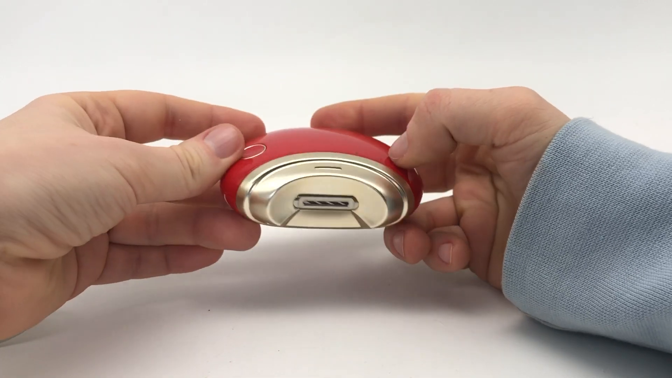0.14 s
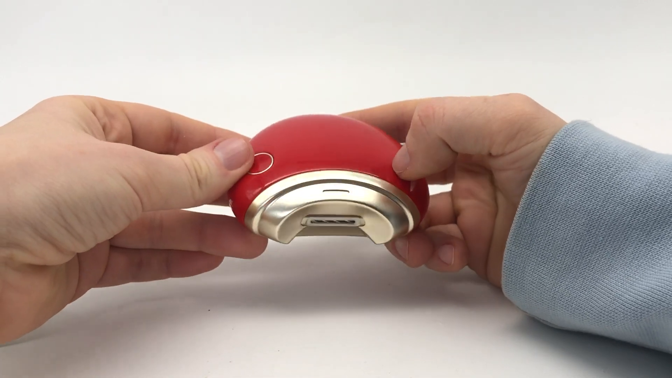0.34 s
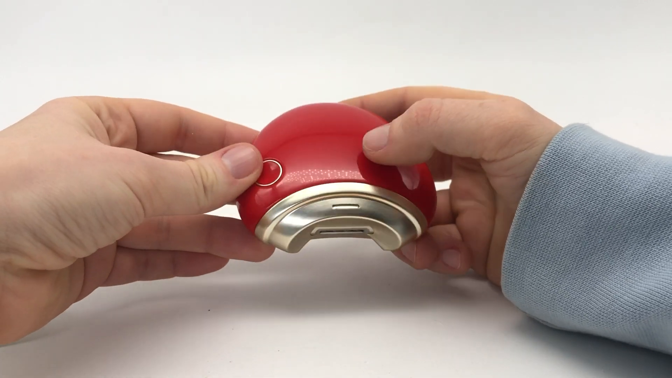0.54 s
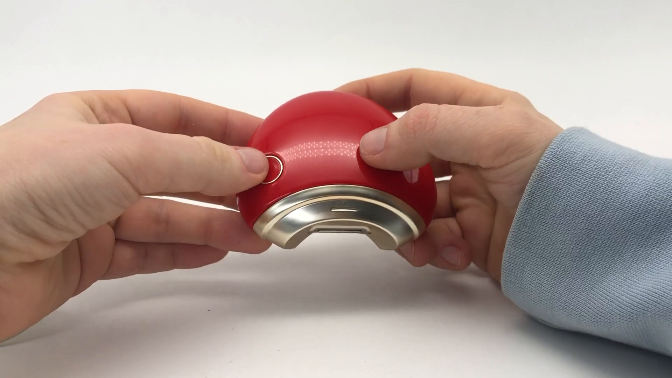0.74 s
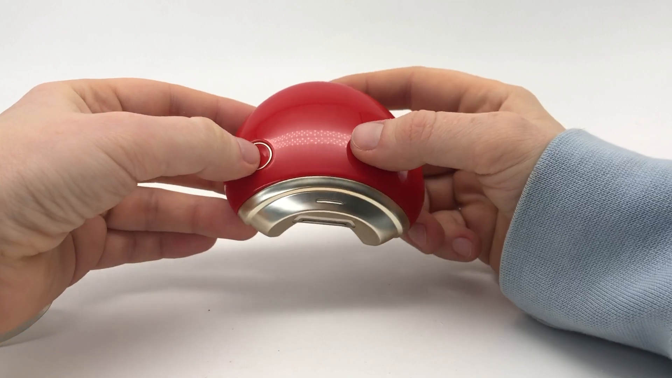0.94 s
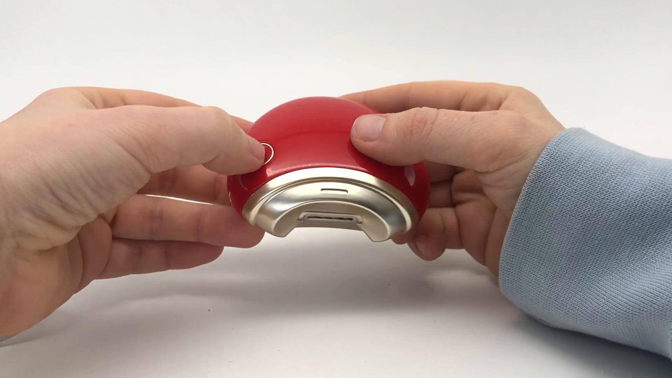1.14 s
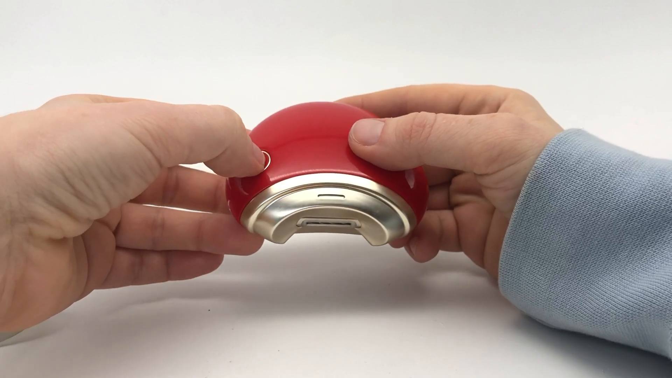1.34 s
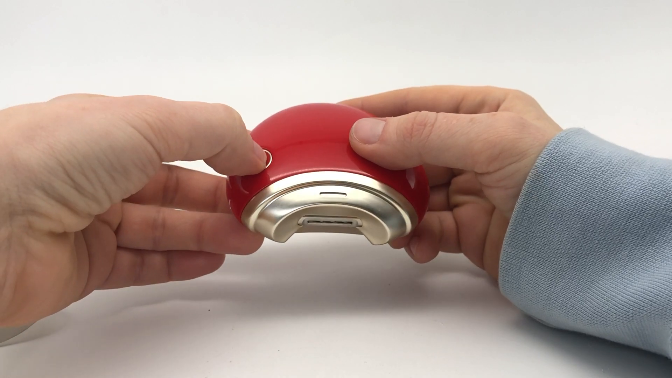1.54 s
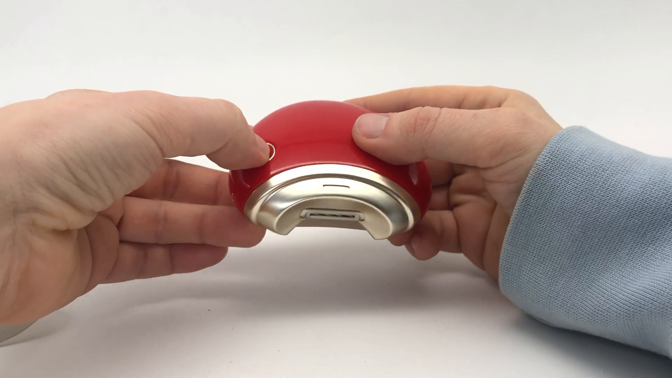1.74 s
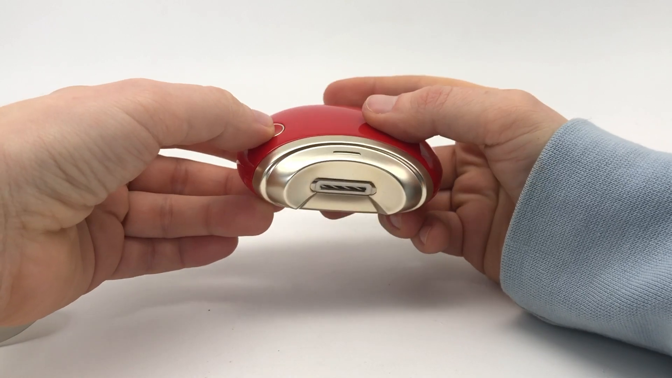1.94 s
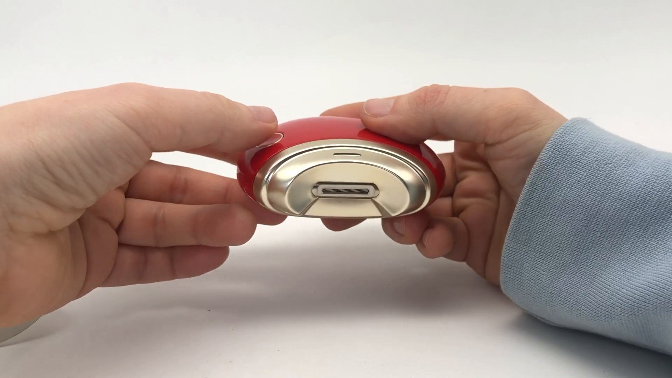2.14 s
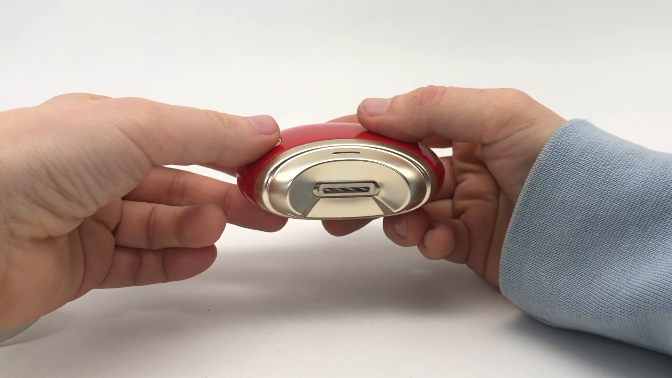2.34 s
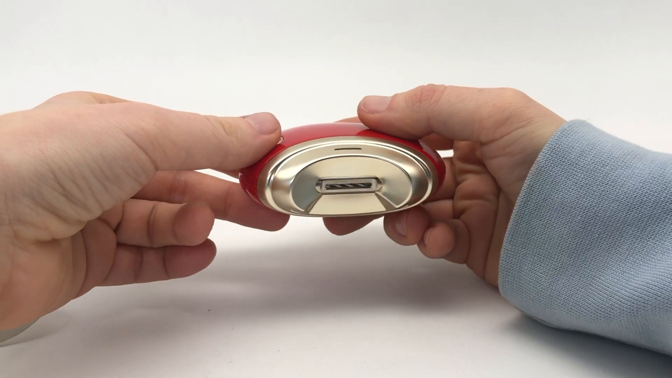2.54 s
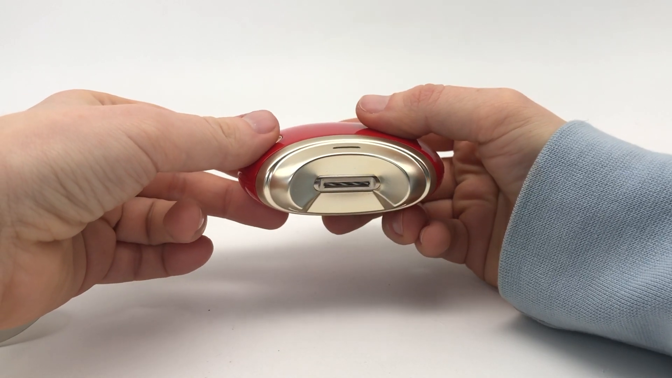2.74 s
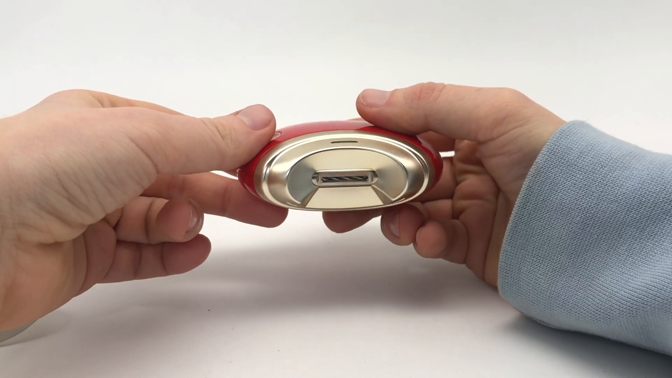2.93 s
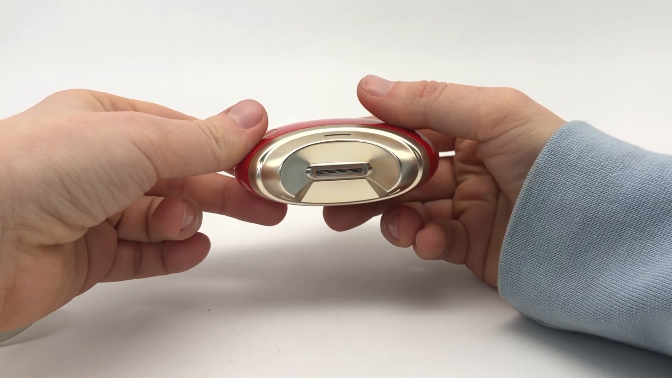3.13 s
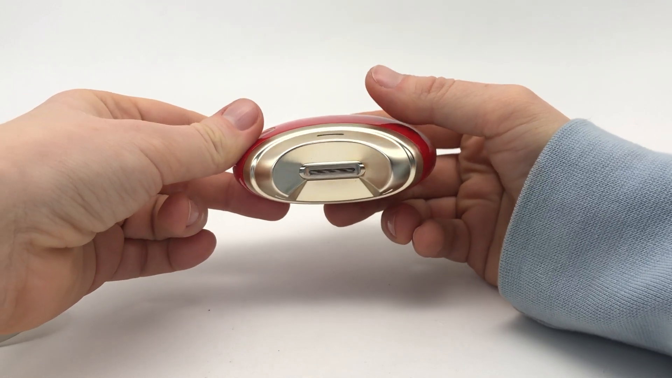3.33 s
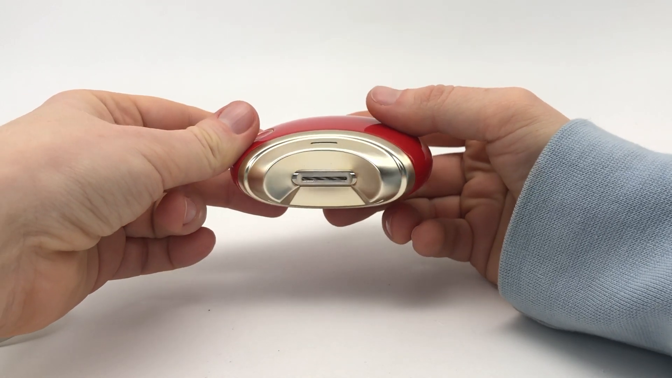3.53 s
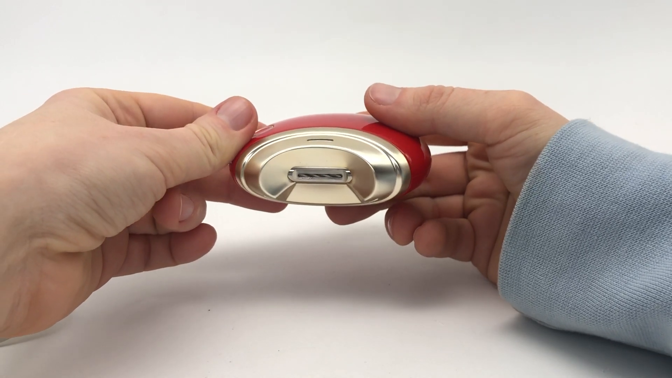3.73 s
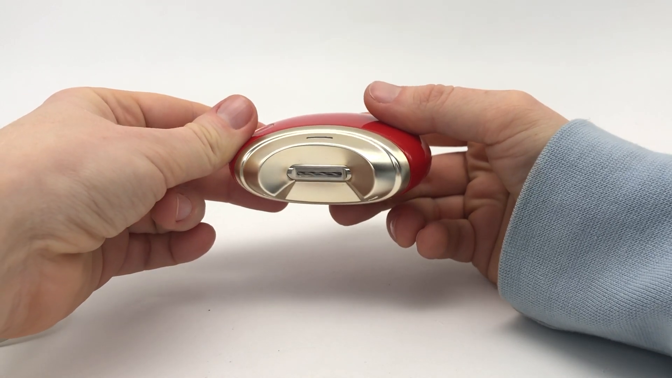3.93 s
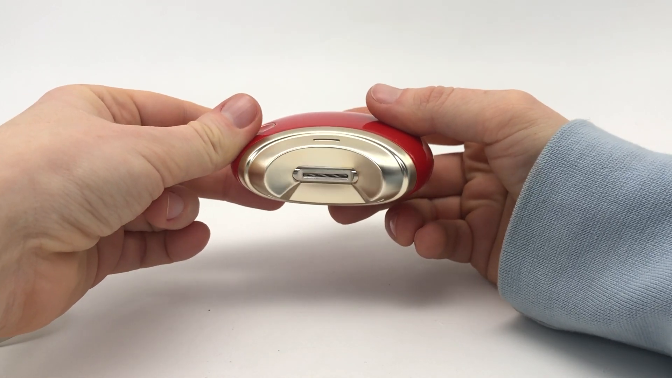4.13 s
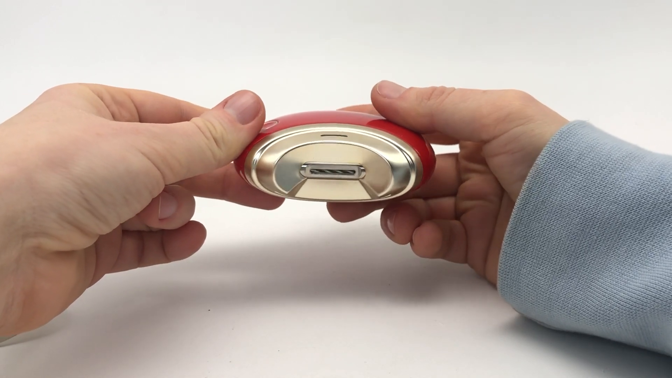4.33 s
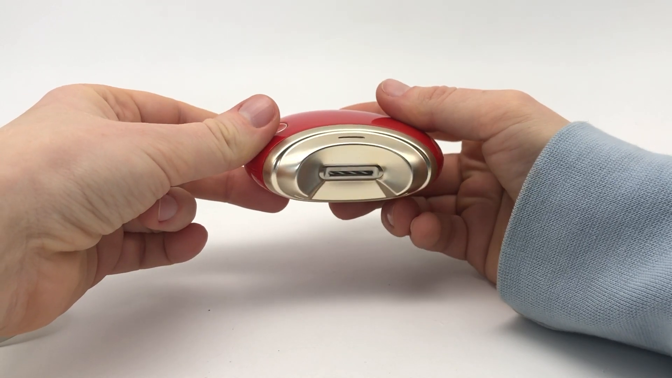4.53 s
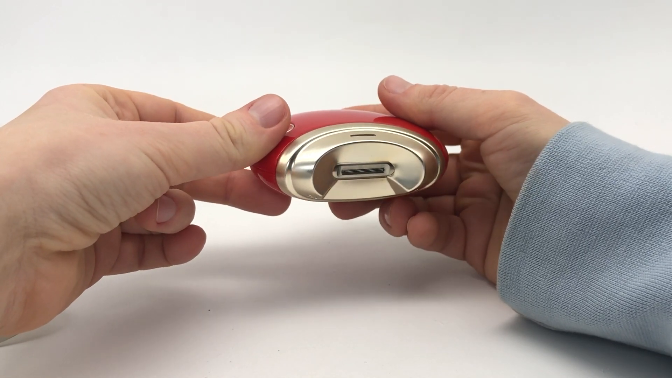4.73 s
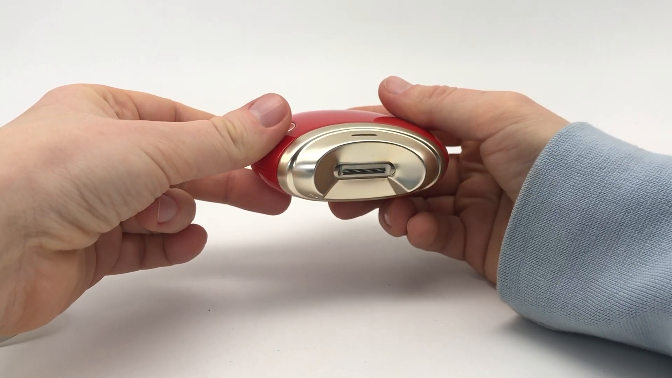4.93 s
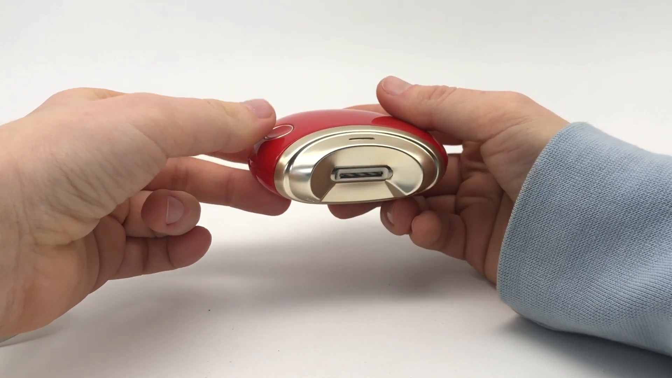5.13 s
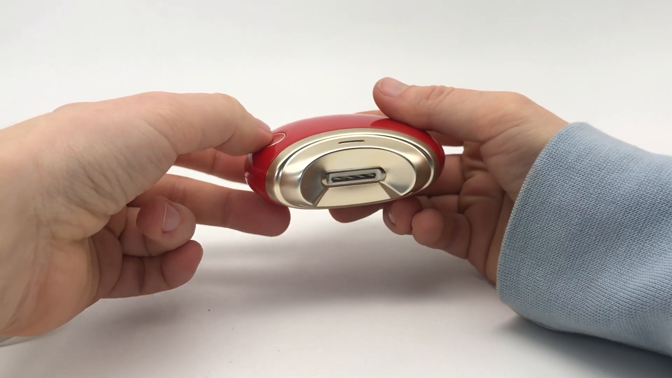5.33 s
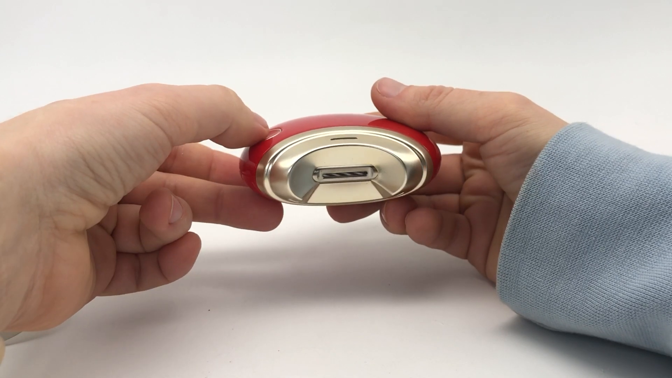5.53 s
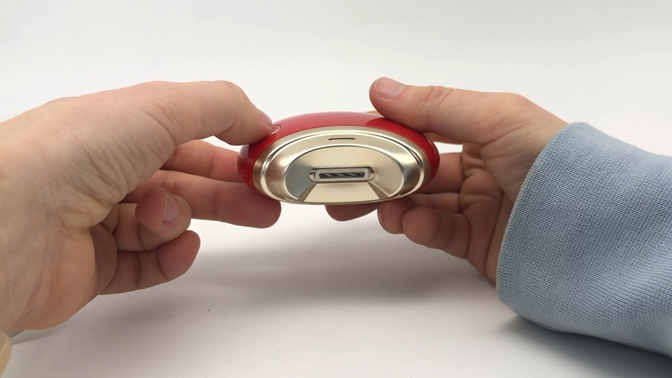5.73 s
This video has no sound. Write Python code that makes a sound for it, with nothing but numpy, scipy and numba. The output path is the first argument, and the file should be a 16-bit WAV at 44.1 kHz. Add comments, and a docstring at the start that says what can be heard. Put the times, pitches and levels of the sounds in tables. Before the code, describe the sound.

A fingernail clicks on a plastic shell, then a button snaps and a small geared motor whirs with a steady, raspy, buzzing whine.

```python
"""In a quiet room, an electric nail clipper is turned over in two hands, close to the microphone.
A fingernail clicks on the shell, fingers scuff it, and the button starts the small geared motor.
The motor runs empty: its pinion (small gear) whines as a stack of sine tones, and loose teeth send
clicks through resonances of the plastic and the metal cap. The brushes are hiss and ticks on every
turn, the cutter makes short bursts of noise, and shaped noise gives the low rumble of the room."""
import sys
import numpy as np
from scipy import signal
from scipy.fft import rfft, irfft
from scipy.io import wavfile
from scipy.ndimage import uniform_filter1d
from numba import njit

SR = 44100
rng = np.random.default_rng(int(sys.argv[2]) if len(sys.argv) > 2 else 0)


def generate_wav(sig):
    """Save sig (samples, or channels by samples) to the path in sys.argv[1] as 16-bit PCM at SR."""
    pcm = np.round(np.clip(np.atleast_2d(sig).T, -1, 1) * 32767).astype(np.int16)
    wavfile.write(sys.argv[1], SR, pcm)


N = 258867
TIME = np.arange(N) / SR  # seconds
FREQ = np.maximum(np.arange(N // 2 + 1) * SR / N, 1)  # Hz
START_S = 1.652  # the motor is switched on
PINION_COUNT, WHEEL_COUNT, SECOND_PINION_COUNT = 15, 45, 10  # teeth on each gear


# gear rattle, before each part's own gain: [t/s, level/dB]
RATTLE_LEVEL = [(1.75, -47.5), (2.4, -46), (3.5, -44.5), (3.75, -46), (4.4, -45.5), (4.6, -45), (5.25, -45),
                (5.6, -45.5)]
# treble of the thin shell walls, before their gain: [t/s, level/dB]
WALL_LEVEL = [(1.75, -60), (1.76, -57.5), (2.97, -57), (4.56, -59.5), (5.85, -60.5)]
# ring of the metal cap as the clipper is turned, before its gain: [t/s, level/dB, resonance f/Hz]
CAP_RING = [(1.75, -60, 6060), (1.78, -57, 6060), (2.45, -57, 5750), (3.4, -61.5, 5880),
            (3.48, -64.5, 6000), (4.13, -65.5, 6000), (4.28, -60.5, 6140), (5.8, -58, 5800)]
# brush sound, before its gain: [t/s, level/dB]
BRUSH_LEVEL = [(1.8, -76.7), (2.6, -78.5), (4.2, -79.1), (4.9, -76.5), (5.7, -78.1)]


def motor(shaft_hz=78.74, spin_up_s=0.016, speed_wander=0.000996, spin_power=8, brush_gain_db=0.5):
    """The shaft spins up in about a tenth of a second, then nearly holds its speed and drives every layer."""
    speed = 1 - np.exp(-np.maximum(TIME - START_S, 0) / spin_up_s)  # share of full speed
    drift = 1 + speed_wander * walk(15.4)
    turns = np.cumsum(shaft_hz * speed * drift) / SR
    # the fingers shift and free the shell, so the whine steps up over 0.11 s
    mesh_db = np.interp(TIME, [2.97, 2.97 + 0.11], [-50.0, -47.5])
    rattle_db, = curves(RATTLE_LEVEL)
    treble_db, = curves(WALL_LEVEL)
    cap_db, cap_hz = curves(CAP_RING)
    brush_db, = curves(BRUSH_LEVEL)
    # the tones only sing out near full speed
    tones = whine(turns, mesh_db, rattle_db) * speed ** spin_power
    plastic = rattle(turns, rattle_db, treble_db, cap_db, cap_hz)
    return tones + plastic + undb(brush_db + brush_gain_db) * brushes(turns)


# tones of the drive: [multiple of the shaft rate, level/dB]
# the tooth-mesh tone (multiple 15) adds to the whine level, all others to the rattle level
TONES = [(8, -57), (9, -24), (10, -25), (12, -23), (13, -35), (14, -29), (15, 0.5), (16, -33), (19, -19.5),
         (20, -11), (21, -13), (22, -15.5), (24, -26), (26, -24), (27, -12.5), (28, -15.5), (29, -25),
         (30, -9), (33, -12), (34, -9.5), (36, -14), (40, -22), (50, -23.5), (63, -42), (66, -24.5)]


def whine(turns, mesh_db, rattle_db, side_db=-2, flutter=0.2, mesh_flutter=0.032):
    """Meshing teeth hum at multiples of the shaft rate; tones above the mesh tone flutter the most."""
    out = np.zeros(N)
    for multiple, db in TONES:
        level_db = mesh_db if multiple == PINION_COUNT else rattle_db + side_db
        depth = flutter if multiple > PINION_COUNT else mesh_flutter
        gain = undb(db + level_db) * (1 + depth * walk(35))
        out += gain * np.sin(2 * np.pi * (multiple * turns + rng.random()))
    return np.sqrt(2) * out  # a sine of peak sqrt(2) has rms 1


# gearbox resonances: [f/Hz, width/Hz, level/dB]
GEARBOX = [(2110, 95, -7), (2367, 324, -4), (2646, 300, -1.5), (3286, 180, -9), (3400, 80, -15)]
# plastic casing resonances: [f/Hz, width/Hz, level/dB]
CASING = [(1376, 310, -11), (1650, 617, -14.5), (1860, 64, -11), (2450, 890, -11), (2986, 260, -13),
          (3546, 130, -9.5)]
# resonances of the thin shell walls: [f/Hz, width/Hz, level/dB]
WALLS = [(3764, 143, 6), (3976, 210, 2.5), (4587, 610, 0.5), (4890, 290, -1), (5440, 340, 0.5),
         (6070, 480, -3), (6410, 210, 1), (6850, 210, -4), (7240, 460, -5), (7810, 310, -9)]
# upper resonances of the metal cap: [f/Hz, width/Hz, level/dB]
CAP_TOP = [(8310, 310, 0.5), (9180, 1250, -6), (11100, 1300, -16)]


def rattle(turns, rattle_db, treble_db, cap_db, cap_hz, gearbox_gain_db=-3.0, casing_gain_db=-8.0,
           walls_gain_db=-0.64, cap_gain_db=-3.5, cap_width_hz=620, cap_top_db=-44.5, cap_top_share=0.47,
           stroke_turns=9.62, stroke_peak_s=3.882, idler_turns=3.6, throb_db=1.66, throb_db_per_s=0.15):
    """The teeth ring gearbox, casing, walls and metal cap; the gearbox throbs with each cutter stroke."""
    drive = teeth(turns)
    # strokes counted from one moment of greatest cutter load; the throb deepens as the motor runs
    stroke = (turns - np.interp(stroke_peak_s, TIME, turns)) / stroke_turns
    depth_db = throb_db + throb_db_per_s * (TIME - START_S)
    idler_db = 1.5 * np.sin(2 * np.pi * turns / idler_turns)  # the idler gear adds a faster, smaller throb
    load_db = depth_db * np.cos(2 * np.pi * stroke) + idler_db
    gearbox = undb(rattle_db + gearbox_gain_db) * resonate(drive * undb(load_db), GEARBOX)
    casing = undb(rattle_db + casing_gain_db) * resonate(teeth(turns), CASING)
    walls = undb(treble_db + walls_gain_db) * resonate(drive, WALLS)
    # the cap beams its ring, so it brightens and dulls as the clipper is turned
    cap = moving_band(teeth(turns), cap_hz, float(cap_width_hz))
    cap = moving_band(cap, cap_hz, float(cap_width_hz))  # twice, for steeper sides
    cap = undb(cap_db + cap_gain_db) * unit(cap)
    cap_top = undb(cap_top_db + cap_top_share * cap_db) * resonate(drive, CAP_TOP)
    return gearbox + casing + walls + cap + cap_top


def teeth(turns, runout_db=2.5, pinion_db=2.0, wheel_db=2.5, second_mesh_db=3.0, scatter_db=6.0,
          play_s=0.000173, rub_db=-6):
    """Teeth slap within their play and rub, harder once a turn and at the worn spots of each gear."""
    places = contacts(turns, count=PINION_COUNT)
    total = len(places)
    late, size = rng.standard_normal((total, 2)).T
    tooth = np.arange(total)
    runout = runout_db * np.cos(2 * np.pi * tooth / PINION_COUNT)  # the pinion sits slightly off centre
    second_mesh = second_mesh_db * np.cos(2 * np.pi * tooth * SECOND_PINION_COUNT / WHEEL_COUNT)
    worn = pinion_db * wear(total, count=PINION_COUNT) + wheel_db * wear(total, count=WHEEL_COUNT)
    force = undb(runout + second_mesh + worn + scatter_db * size)
    force = np.tanh(force / 2.6)  # soft plastic teeth cushion the hardest blows
    flank = rng.choice([-1, 1], total)  # front or back of the tooth
    slaps = pulses(places + play_s * SR * late, force * flank)
    rub = np.interp(np.arange(N), places, force, left=0) * rng.standard_normal(N)
    return unit(slaps) + undb(rub_db) * unit(rub)


# tone colour of the brushes: [f/Hz, level/dB]
BRUSH = [(5000, -16), (9000, -1), (11100, 8), (12400, 2), (13100, 0), (15700, -3)]


def brushes(turns, uneven_db=3, hiss_db=-4):
    """Brushes hiss on the commutator and tick over its 12 gaps in nearly the same pattern every turn."""
    places = contacts(turns, count=12)
    total = len(places)
    sizes = undb(uneven_db * wear(total, count=12) + rng.standard_normal(total))
    uneven_places = places + 12 * wear(total, count=12)  # shifts in samples
    gaps = unit(pulses(uneven_places, sizes))
    hiss = undb(hiss_db) * rng.standard_normal(N) * (turns > 0)
    return unit(colour(gaps + hiss, slope(BRUSH)))


def jolts(length_s=0.04, level_db=-40, scatter_db=3, mount_hz=1200, mount_db=-7, mount_t60=0.073,
          walls_db=-19, count=7):
    """As the motor pulls away, gears jolt through their play and ring the mount and the plastic around it."""
    quiet_walls = [(hz, width, db + walls_db) for hz, width, db in WALLS]
    plastic = list(CASING) + list(GEARBOX) + quiet_walls
    # narrow resonances ring longer
    modes = [(hz, db, np.log(1000) / (np.pi * width / 2)) for hz, width, db in plastic]
    passed = np.cumsum(.5 + rng.random(count))  # uneven gaps
    s = START_S + length_s * (passed - passed[0]) / np.ptp(passed)
    db = level_db + scatter_db * rng.standard_normal(count)
    return strike(s, undb(db), ring(modes + [(mount_hz, mount_db, mount_t60)]))


# knocks on the shell: [t/s, ring level/dB, crack level/dB, thud level/dB]
KNOCKS = [(0.7744, -53, -47, -73), (0.7765, -34.5, -45, -70), (0.7779, -48, -58.5, -58),
          (1.6298, -57, -35.5, -35.5), (1.6345, -61, -53, -53), (1.812, -65, -75, -37)]
# ways the shell vibrates: [f/Hz, level/dB, time to fall 60 dB t60/s]
SHELL = [(600, -2.5, 0.027), (1740, -7, 0.042), (2070, -9, 0.064), (2360, -18, .06), (3240, -10, 0.038),
         (3440, -5, 0.028), (3710, 2.5, 0.014), (4770, -15, 0.067), (6500, -9, 0.065), (6630, -17, .055),
         (6580, -5, 0.044), (6970, -6, 0.046), (8930, -10, .06), (9200, -4.5, 0.018), (10900, -18, 0.065),
         (11500, -19, .05), (12970, -11, 0.03)]
# ways the body vibrates, damped by the hands: [f/Hz, level/dB, time to fall 60 dB t60/s]
BODY = [(322, -7.5, 0.026), (545, -3, 0.03), (780, -0.5, 0.0091), (1345, -4.5, 0.017)]
# tone colour of the crack: [f/Hz, level/dB]
CRACK = [(300, -19), (1300, -0.5), (2300, 5), (3500, 3), (4600, 0.5), (5900, 3.5), (8000, -6), (12000, -10),
         (16000, -22)]


def knocks():
    """Nail and button: a crack of noise, the ringing shell and a dull thud of the body."""
    s, ring_db, crack_db, thud_db = np.transpose(KNOCKS)
    crack = bursts(s, crack_db, CRACK, t60=0.0077, tail_db=-15.0, tail_t60=0.097)
    shell = strike(s, undb(ring_db), ring(SHELL))
    thud = strike(s, undb(thud_db), ring(BODY))
    return shell + crack + thud


# fingers shifting on the shell, before the gain: [t/s, level/dB, pitch of the scuff f/Hz]
TOUCHES = [(0.076, -67, 11000), (0.253, -64.5, 2200), (0.4, -59.5, 5100), (0.746, -62, 3600),
           (1.278, -65, 4670), (1.399, -61, 6100), (1.407, -71, 6100)]
# tone colour of skin on the shell: [f/Hz, level/dB]
TOUCH = [(500, 1), (2000, 1.5), (5000, 2.5), (10500, 6.5), (16000, -14)]
# sharp ticks from the cutter, before the gain: [t/s, level/dB]
TICKS = [(1.7712, -49), (1.7982, -50), (1.864, -46.5), (2.074, -42), (2.289, -47), (2.3225, -44),
         (2.3973, -49), (2.715, -47), (2.9291, -44.5), (3.3556, -51), (4.21, -49), (4.8836, -43),
         (5.0627, -53), (5.2767, -50)]
# tone colour of a cutter tick: [f/Hz, level/dB]
TICK = [(2000, -20), (6000, 2), (8300, 1), (9300, 5), (11500, -11.5), (16000, -16)]


def small_ticks(touch_db=-10, tick_db=-8, scuff_db=9, scuff_width_hz=550):
    """Skin slips on the shell, each scuff at its own pitch; the cutter catches now and then."""
    s, db, hz = np.transpose(TOUCHES)
    skin = bursts(s, db + touch_db, TOUCH, t60=0.094, tail_db=-12, tail_t60=0.13)
    nearest = np.abs(TIME[:, None] - s).argmin(axis=1)  # the touch closest in time
    skin = skin + undb(scuff_db) * moving_band(skin, hz[nearest], float(scuff_width_hz))
    s, db = np.transpose(TICKS)
    return skin + bursts(s, db + tick_db, TICK, t60=0.016, tail_db=-7.5, tail_t60=0.084)


# tone colour of the room noise: [f/Hz, level per Hz/dB]
ROOM = [(20, -37), (36, -9.5), (54, 3.5), (66, 0.5), (100, -7), (135, -3.5), (170, -1), (240, -10),
        (500, -18), (1000, -26.5), (2500, -32), (6000, -33), (11000, -34.5), (16000, -44)]


def room(level_db=-64):
    """Low ventilation rumble under a faint even hiss, both from one shaped noise."""
    return undb(level_db) * unit(colour(rng.standard_normal(N), slope(ROOM)))


# the tools that the sources share
def undb(db):
    """Decibels to gain."""
    return 10 ** (np.asarray(db) / 20)


def unit(x):
    """Scale to rms 1."""
    return x / np.std(x)


def curves(rows):
    """Each column of a table after the time, as a value per sample."""
    s, *columns = np.transpose(rows)
    return [np.interp(TIME, s, c) for c in columns]


def walk(rate):
    """Smooth random drift with a spread of 1; a higher rate drifts faster."""
    k = max(int(SR / rate), 1)
    smooth = uniform_filter1d(rng.standard_normal(N), k, mode="wrap")
    return unit(uniform_filter1d(smooth, k, mode="wrap"))


def slope(points):
    """Gain per frequency from (Hz, dB) points."""
    hz, db = np.transpose(points)
    return undb(np.interp(np.log(FREQ), np.log(hz), db))


def colour(x, gain):
    """Filter with the given gain per frequency that never sounds before its input (minimum phase)."""
    cepstrum = irfft(np.log(gain + 1e-9), N)
    # fold the second half onto the first, so that the response starts at once
    cepstrum[1:N // 2] *= 2
    cepstrum[N // 2:] = 0
    response = irfft(np.exp(rfft(cepstrum)), N)[:SR // 8]
    return signal.fftconvolve(x, response)[:N]


def resonate(x, modes):
    """Pass through a set of (Hz, width, dB) resonances; rms 1."""
    power = sum(undb(2 * db) / (1 + (2 * (FREQ - hz) / width) ** 2) ** 2 for hz, width, db in modes)
    return unit(colour(x, np.sqrt(power)))


@njit
def moving_band(x, hz, width):
    """State-variable band-pass whose centre moves."""
    y, band, low = np.empty(len(x)), 0., 0.
    for i in range(len(x)):
        g, k = np.tan(np.pi * hz[i] / SR), width / hz[i]
        v = (band + g * (x[i] - low)) / (1 + g * (g + k))
        band, low, y[i] = 2 * v - band, low + 2 * g * v, k * v
    return y


def strike(times, sizes, response):
    """Start a response at each time."""
    hits = np.bincount((np.asarray(times) * SR).astype(int), sizes, N)[:N]
    return signal.fftconvolve(hits, response[:SR // 4])[:N]


def fade(t60):
    """Exponential decay that falls 60 dB in t60 seconds."""
    return np.exp(-np.log(1000) * TIME[:SR // 4] / t60)


def ring(modes):
    """Decaying (Hz, dB, t60) sines after one blow, peak 1."""
    y = np.zeros(SR // 4)
    for k, (hz, db, t60) in enumerate(modes):
        y += (-1) ** k * undb(db) * fade(t60) * np.sin(2 * np.pi * hz * TIME[:SR // 4])
    return y / np.abs(y).max()


def bursts(times, db, points, t60, tail_db, tail_t60):
    """Short cracks of noise, each with a weak tail."""
    shape = fade(t60) + undb(tail_db) * fade(tail_t60)
    noise = unit(colour(rng.standard_normal(N), slope(points)))
    return strike(times, undb(db), shape) * noise


def contacts(turns, count):
    """Sample positions at which each of count evenly spaced parts passes, from the first movement on."""
    passed = np.arange(int(turns[-1] * count)) / count + 1e-6
    return np.interp(passed, turns, np.arange(N))


def pulses(places, sizes):
    """Band-limited clicks at fractional sample positions."""
    taps = places.astype(int)[:, None] + np.arange(-7, 9)
    lag = taps - places[:, None]
    shape = np.sinc(lag) * np.sinc(lag / 8)
    return np.bincount(np.clip(taps, 0, N - 1).ravel(), (sizes[:, None] * shape).ravel(), N)


def wear(total, count):
    """Unevenness of count parts, repeated turn after turn."""
    flaws = rng.permutation(np.linspace(-1, 1, count))
    return np.resize(unit(flaws), total)


def scene():
    """The clipper close by, over the quiet room."""
    return (motor() + jolts() + knocks() + small_ticks() + room())[None]


def record(dry, top_hz=15750):
    """The recorder cuts the top steeply."""
    low_pass = signal.ellip(12, .1, 80, top_hz, fs=SR, output="sos")
    return signal.sosfilt(low_pass, dry)


dry = scene()
out = record(dry)
generate_wav(out)
```